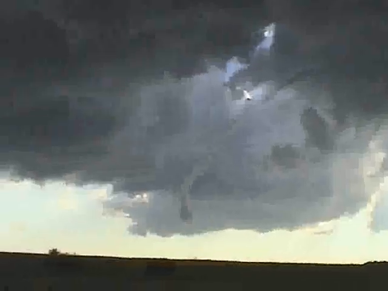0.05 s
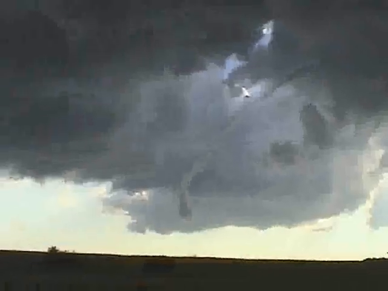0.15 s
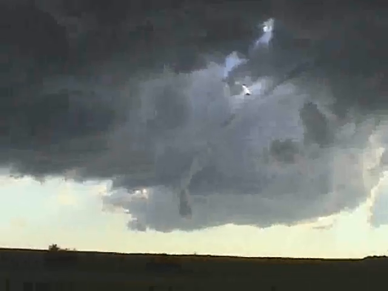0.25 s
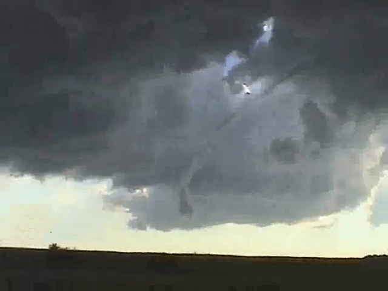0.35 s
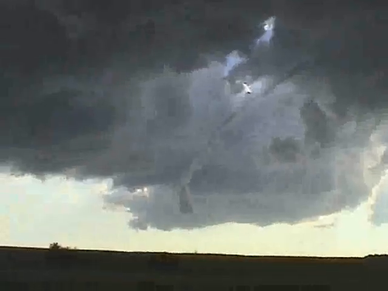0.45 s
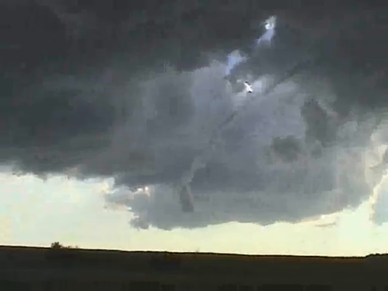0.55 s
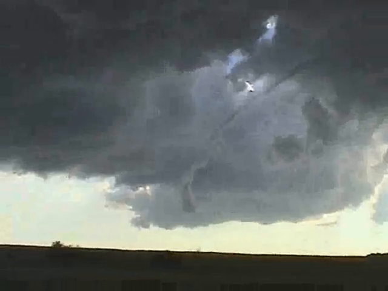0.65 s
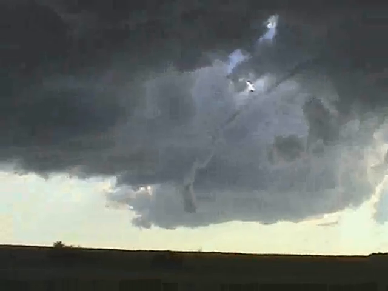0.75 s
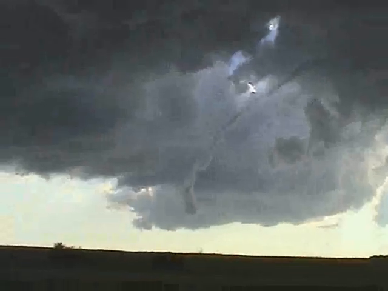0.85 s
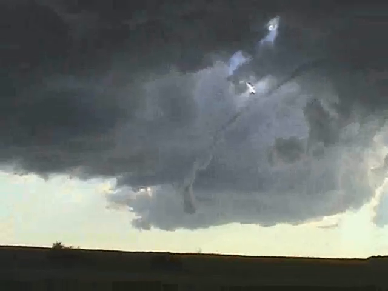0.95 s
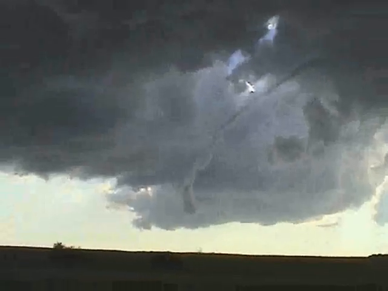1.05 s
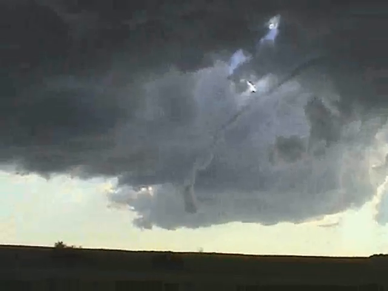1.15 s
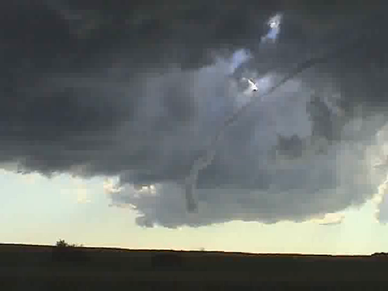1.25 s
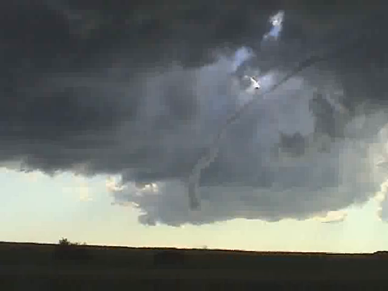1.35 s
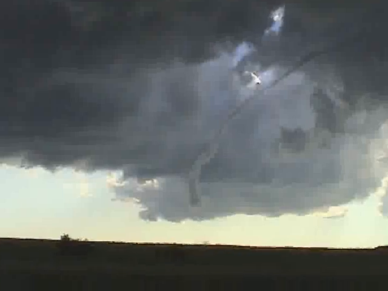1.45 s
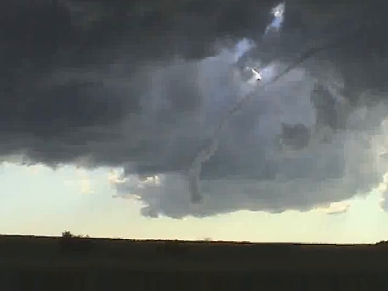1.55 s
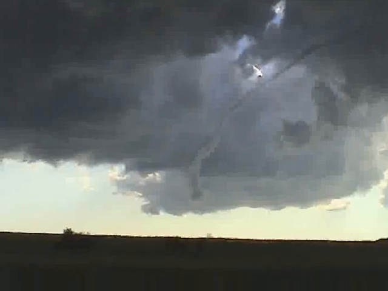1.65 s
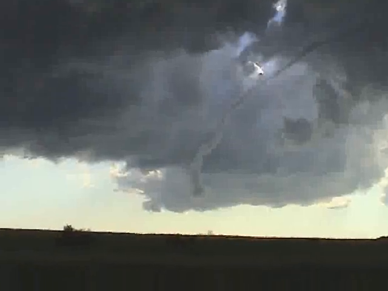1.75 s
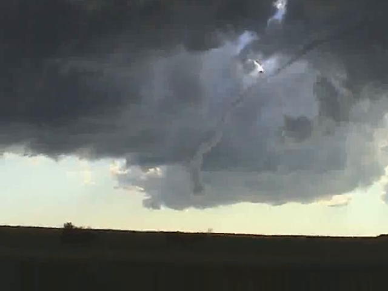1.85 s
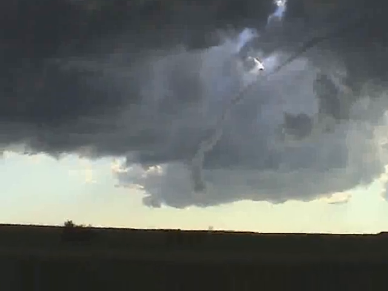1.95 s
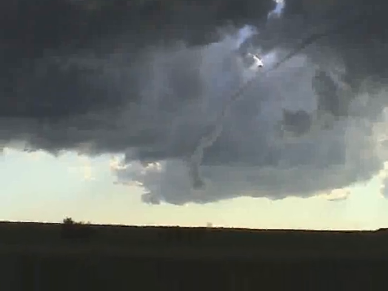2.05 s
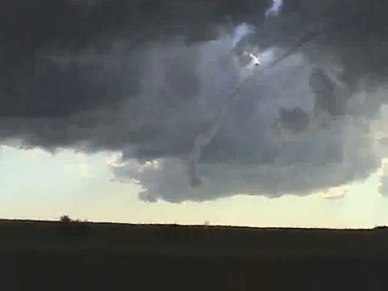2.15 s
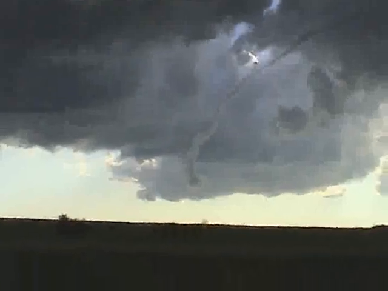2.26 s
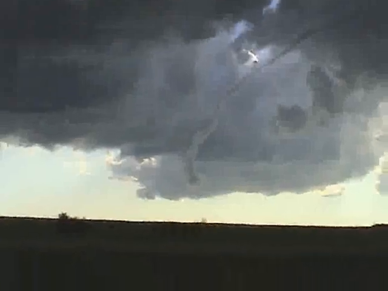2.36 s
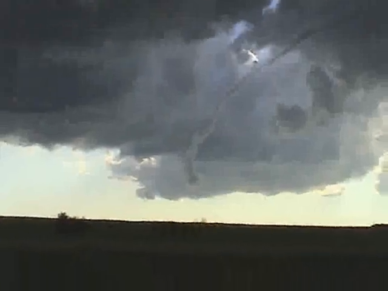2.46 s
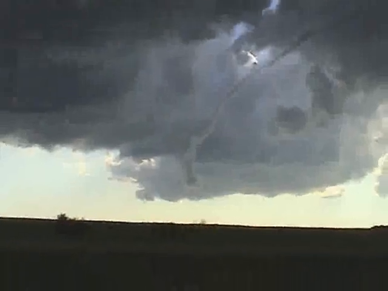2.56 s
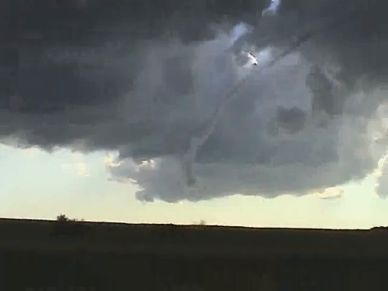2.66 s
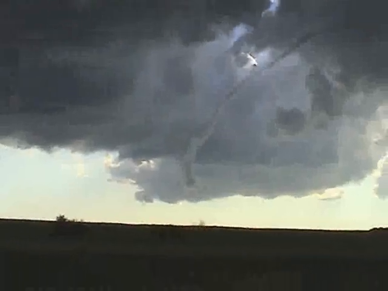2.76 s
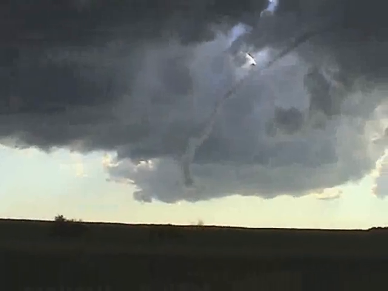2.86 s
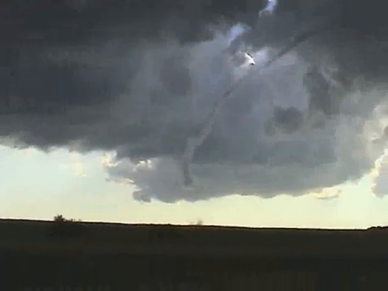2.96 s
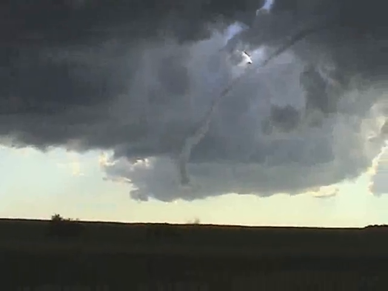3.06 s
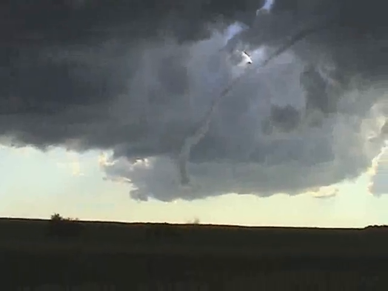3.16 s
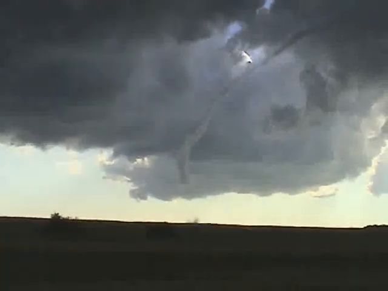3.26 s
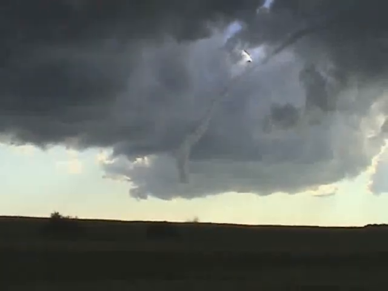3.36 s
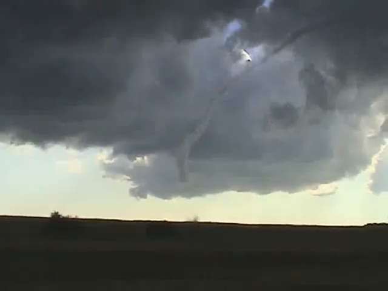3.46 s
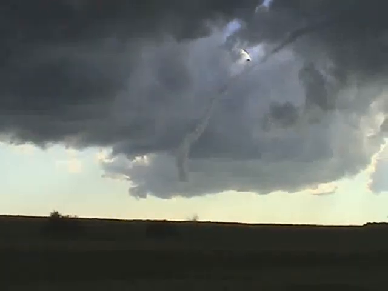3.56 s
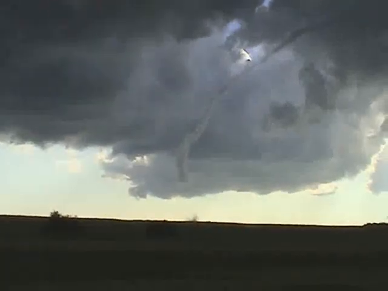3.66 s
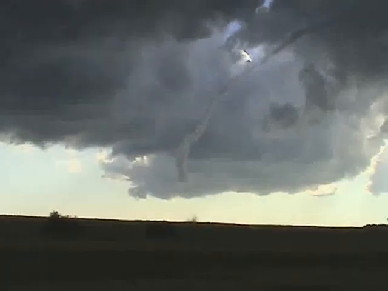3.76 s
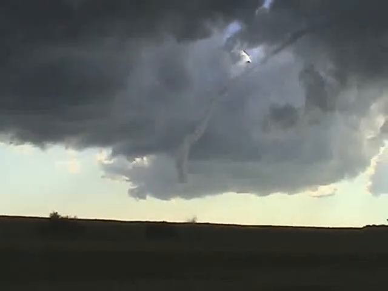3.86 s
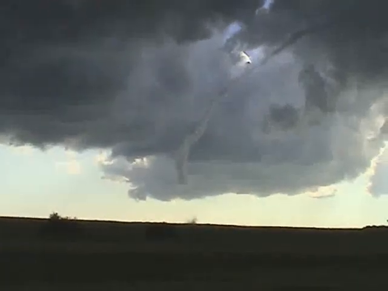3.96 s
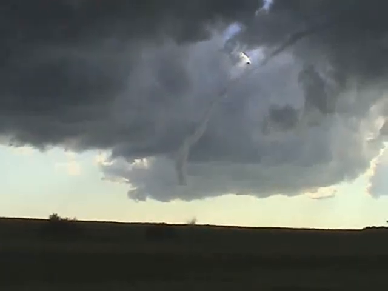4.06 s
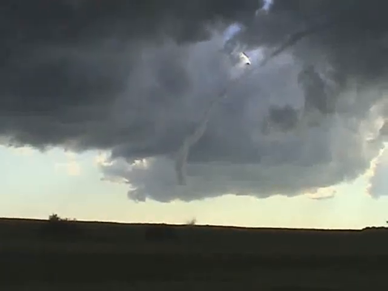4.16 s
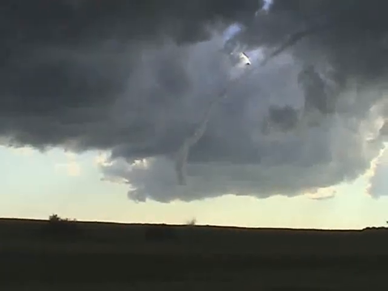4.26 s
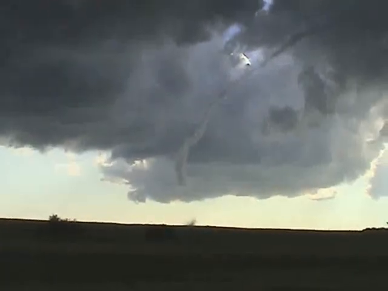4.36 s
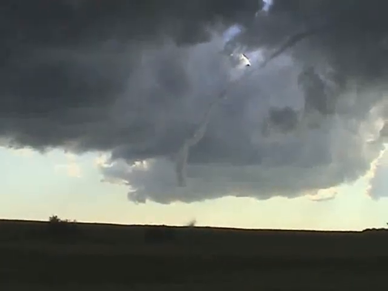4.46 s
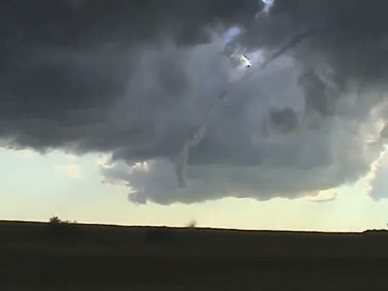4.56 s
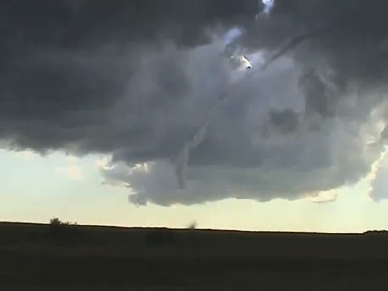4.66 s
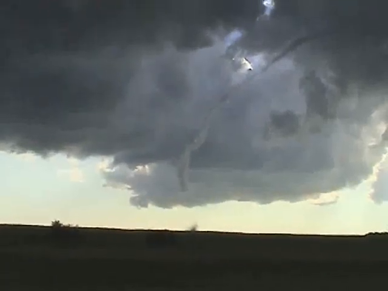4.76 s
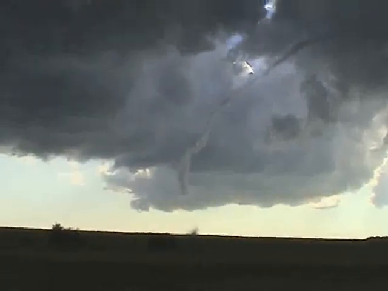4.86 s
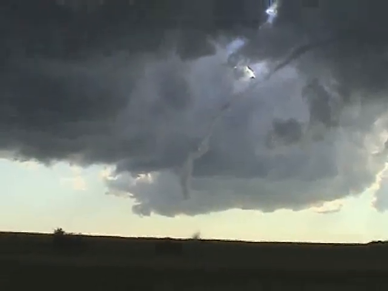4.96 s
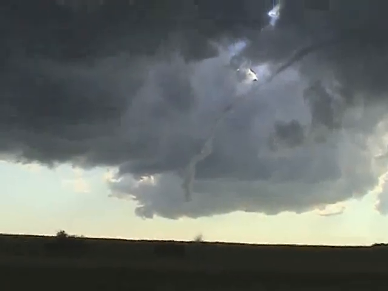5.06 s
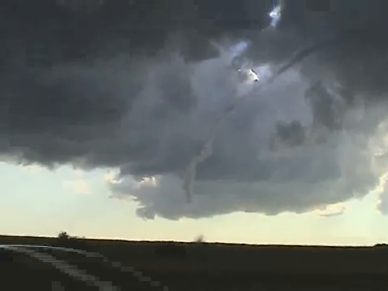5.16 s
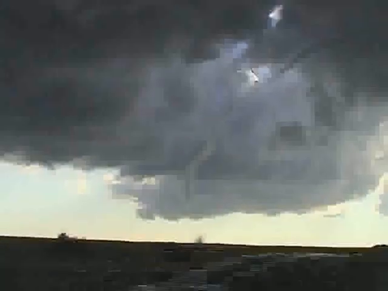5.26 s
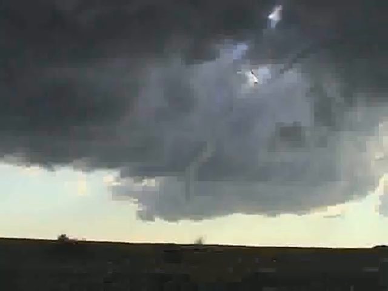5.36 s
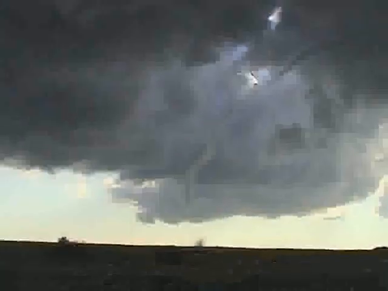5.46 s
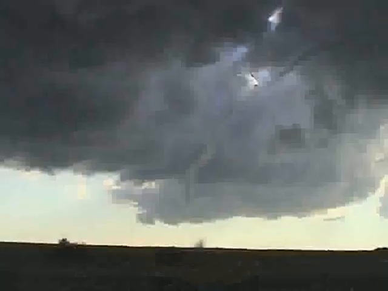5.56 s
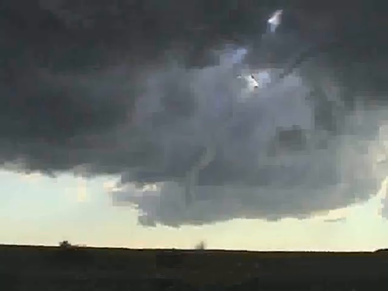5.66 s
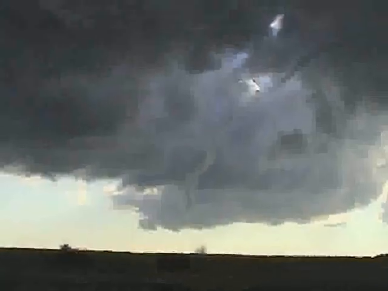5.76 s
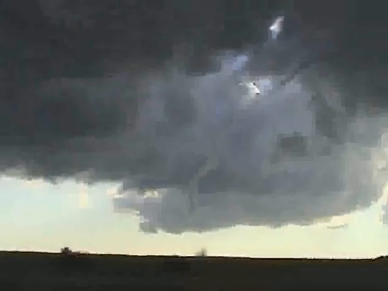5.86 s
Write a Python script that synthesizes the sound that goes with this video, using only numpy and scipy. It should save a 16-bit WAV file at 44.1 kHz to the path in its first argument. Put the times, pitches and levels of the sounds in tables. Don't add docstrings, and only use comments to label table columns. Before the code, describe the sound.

Heard from beside an idling vehicle on an open country road: low unsteady engine hum, faint belt whine and sparse flasher relay clicks. A car approaches from the left, its tyres singing and hissing, grows steadily louder, sweeps past with a falling pitch and begins receding to the right. Stereo sound with dull, compressed treble cuts abruptly to silence seven times in the first half.

```python
import sys
import numpy as np
from scipy import signal
from scipy.io import wavfile
from scipy.ndimage import uniform_filter1d, minimum_filter1d

SR = 44100
rng = np.random.default_rng(int(sys.argv[2]) if len(sys.argv) > 2 else 0)


def voltage_ratio(decibels):
    exponent = np.asarray(decibels, float) / 20
    return 10 ** exponent


def pcm_store(signal):
    levels = np.round(np.clip(np.atleast_2d(signal), -1, 1) * 32767)
    wavfile.write(sys.argv[1], SR, levels.astype(np.int16).T)


N = 261051
HZ = np.fft.rfftfreq(1024, 1 / SR)[:, None]
FRAME_S = np.arange(N // 256 + 5) * 256 / SR
SPEED, GAP, ABREAST = 29.5, 6.61, 5.2

# frequency in Hz, likeness 0-1, fixed left-right in dB,
# share of the bearing's dB, left lead in rad when far left.
CAR_PORTS = [(60, .95, -3, .1, .9), (250, .96, -2, .1, .7), (600, .9, -1.5, .45, .8),
             (1050, .96, 0, 1, .95), (2000, .88, 0, .9, 1.)]


def car():
    _, receding, _ = passing(FRAME_S)
    dip = bank_dip()
    same, fixed_db, share, lead = by_pitch(CAR_PORTS, HZ)
    bearing_db = -1.5 - 7.5 * receding
    left_db = fixed_db + share * bearing_db
    lead = lead * (0.45 - 0.63 * receding)
    return ports(tyre_noise() * dip, spectra(tyre_tones()) * dip, same, left_db, lead, patchy_db=1.0)


# frequency in Hz, width in Hz, level in dB, dB louder ahead than behind.
TREAD_MODES = [(834.3, 33, -6.5, -6), (896, 41, -7, 10.5), (981, 54, -3.5, 4), (954, 150, 0.5, 1.5),
               (1083.5, 17.6, -1.5, 3), (1147.5, 29, -5, 5)]
GROOVE_MODES = [(1284, 62, -3, 6), (1496, 61, -0.5, 2.3), (1646, 89, -0.5, 0.7)]
# time in seconds, level in dB.
SINGING = [(0, 3.5), (.7, 1), (1.4, 4.5), (2.1, 1.5), (3.4, -1), (3.9, -1.5), (4.4, -.5), (4.61, -2.5),
           (4.64, 2.5), (4.74, 0), (5.02, 2), (5.17, 0), (5.32, -2.5), (5.56, 2.5), (5.64, 0), (5.92, -3.5)]
# level abreast in dB, share of
# spreading loss, horn gain ahead in dB, horn gain behind in dB, share of road gain.
SONG_LEVEL = (-10, 1.23, 5, -1.5, .5)
BLOCKS_LEVEL = (-22, 0.96, 10.5, -7, -1)
ROAR_LEVEL = (-20.5, 0.78, 6.5, 4.5, 0.8)


def tyre_tones():
    t = np.arange(N) / SR
    _, receding, shift = passing(t)
    road = rng.standard_normal(N) * voltage_ratio(0.5 * slow(40))
    song = ringing(road, TREAD_MODES, receding, shift)
    grooves = ringing(road, GROOVE_MODES, receding, shift)
    blocks_hz = 1004 * shift * (1 + 0.0054 * slow(30))
    blocks_db = heard_db(BLOCKS_LEVEL, t) + 2.3 * slow(18)
    blocks = np.sqrt(2) * voltage_ratio(blocks_db) * np.sin(2 * np.pi * np.cumsum(blocks_hz) / SR)
    sung = voltage_ratio(heard_db(SONG_LEVEL, t)) * song + blocks
    return voltage_ratio(columns(SINGING, t)[0]) * sung + voltage_ratio(heard_db(ROAR_LEVEL, t) - 0.5) * grooves


def ringing(road, modes, receding, shift):
    out = np.zeros(N)
    for hz, width, db, ahead_db in modes:
        out += voltage_ratio(db - ahead_db * receding / 2) * evened(resonate_twice(road, hz * shift, width))
    return evened(out)


# frequency in Hz, level in dB per Hz.
RUMBLE = [(30, -45), (70, -4.5), (150, -1), (250, 0), (420, -4), (650, -5.5), (900, -0.5), (1500, -55.5),
          (3000, -94)]
ROAR = [(400, -23.5), (700, -13.5), (1200, -10.5), (1800, 0), (2200, -3), (3000, -16.5), (4500, -22),
        (7000, -88)]
HISS = [(1500, -26), (2500, -0.5), (3500, -1), (5000, -3.5), (7000, -7.5), (9000, -10.5), (11500, -12.5)]
# level abreast in dB, share of spreading loss, horn gain ahead in dB,
# horn gain behind in dB, share of road gain.
RUMBLE_LEVEL = (-17.5, 1.01, 5, -1.5, .3)
HISS_LEVEL = (-19, 0.97, 1.5, 0.5, 1.24)


def tyre_noise():
    metres, _, shift = passing(FRAME_S)
    flicker_db = 1.1 * slow_frames(50)
    air_db = 0.1973 * metres * (HZ / 1e4) ** 2
    shaded_db = np.minimum(1 * (metres - GAP), 7.5)
    dulled_db = air_db + shaded_db * np.clip((HZ - 8620) / 1000, 0, 1)
    layers = [(RUMBLE, heard_db(RUMBLE_LEVEL, FRAME_S)),
              (ROAR, heard_db(ROAR_LEVEL, FRAME_S) + 0.39 * flicker_db),
              (HISS, heard_db(HISS_LEVEL, FRAME_S) + flicker_db - dulled_db)]
    return np.sqrt(sum((colour(spectrum, shift) * voltage_ratio(db)) ** 2 for spectrum, db in layers))


def passing(t):
    along = SPEED * (t - ABREAST)
    metres = np.hypot(along, GAP)
    receding = along / metres
    return metres, receding, 1 / (1 + receding * SPEED / 343)


# time in seconds, level in dB.
ROAD = [(0, 2), (.6, -1.5), (1.2, 2.5), (1.7, -1.5), (2.2, -0.5), (2.9, 0.5), (3.4, 1), (3.95, -2),
        (4.3, -1.5), (4.58, 1.5), (4.8, 0.5), (5.02, -1.5), (5.13, 1), (5.32, 0.5), (5.55, 0), (5.75, -1.5),
        (5.86, 1.5), (5.92, 2.5)]


def heard_db(layer, t):
    abreast_db, spread, ahead_db, behind_db, coarse = layer
    along = SPEED * (t - ABREAST)
    off_deg = np.degrees(np.arctan2(GAP, abs(along)))
    ahead = ahead_db * np.exp(-((off_deg - 30.1) / 19.3) ** 2)
    behind = behind_db * np.exp(-((off_deg - 50) / 24.3) ** 2)
    horn_db = np.where(along < 0, ahead, behind)
    spreading_db = 20 * np.log10(GAP / np.hypot(along, GAP))
    return abreast_db + spread * spreading_db + horn_db + coarse * columns(ROAD, t)[0]


def bank_dip():
    since = FRAME_S - 1.55
    octaves = np.log2((HZ + 1) / 2400) - 0.95 * since
    return voltage_ratio(-7.5 * np.exp(-(octaves / 0.37) ** 2 - (since / 0.98) ** 4))


# start in seconds, level in dB, 1 closing or 0 opening.
TICKS = [
    (0.528, -31.5, 1),
    (.838, -48, 0),
    (1.244, -39, 1),
    (1.562, -36.5, 0),
    (1.886, -32, 1),
    (2.169, -37.5, 0),
    (2.491, -31.5, 1),
    (3.187, -31, 1),
    (3.861, -30.5, 1),
]
# frequency in Hz, width in Hz, dB when closing, dB when opening.
RELAY_CASE = [(2090, 180, -2, -25), (3420, 560, 2, -19), (4560, 1300, 0.5, 0), (5640, 500, -7, -8),
              (6470, 860, 1, -8), (8800, 530, -9, -22)]


def relay():
    out, t = np.zeros(N), np.arange(2000) / SR
    for start, db, closing in TICKS:
        t60 = 0.08 if closing else 0.045
        chatter = rng.standard_normal(len(t)) * np.minimum(t / 0.00079, 1) * voltage_ratio(-60 * t / t60)
        ring = np.zeros(len(t))
        for hz, width, shut_db, open_db in RELAY_CASE:
            ring += voltage_ratio(shut_db if closing else open_db) * evened(resonate_twice(chatter, hz, width))
        out[round(start * SR):][:len(t)] += voltage_ratio(db - 9.0) * evened(ring)
    return out


# time in seconds, firing rate in Hz.
IDLE = [(0, 77.86), (.6, 77.7), (1.5, 77.2), (2.3, 76.87), (3.2, 76.28), (5.92, 75.8)]
# dB when settled, dB gained per Hz above settled.
ORDER_LEVELS = [(-39.5, 3), (-45, 6)]
# frequency in Hz, width in Hz, level in dB.
WHINES = [(253.4, 16.5, -48), (422, 11.5, -43.5), (453, 2.4, -50), (636, 3.5, -49), (1042, 19, -38.5),
          (1160, 4.7, -48.5), (1280, 36, -45)]
# frequency in Hz, level in dB per Hz.
BAY = [(25, -31), (45, -21.5), (62, -4), (110, -12.5), (230, -15.5), (500, -12), (1070, -11.5),
       (2000, -27.5), (3600, -41), (6000, -42), (7900, -52), (8900, -40), (9700, -42), (10300, -33),
       (11700, -29.5)]
# frequency in Hz, likeness 0-1, left-right in dB, left lead in rad.
BAY_PORTS = [(30.1, .8, -2, .8), (75, 1, -6, 1), (200, 1, -4, 0.53), (600, 0.71, -2.5, 0.26),
             (1090, 0.45, 3, 0.7), (2000, 1, -7, 0.34)]


def parked():
    hz, = columns(IDLE, np.arange(N) / SR)
    first_db, second_db = (db + per_hz_db * (hz - 76.4) for db, per_hz_db in ORDER_LEVELS)
    first_db = first_db + 1.0 * slow(20)
    second_db = second_db + 1.7 * slow(9.4)
    turns = 2 * np.pi * np.cumsum(hz * (1 + 0.0098 * slow(5.77))) / SR
    hum = np.sqrt(2) * (voltage_ratio(first_db) * np.sin(turns) + voltage_ratio(second_db) * np.sin(2 * turns + 1.04))
    shake = rng.standard_normal(N)
    whine = sum(voltage_ratio(db) * evened(resonate(shake, f, width)) for f, width, db in WHINES)
    bay = colour(BAY) * voltage_ratio(-32.5 + 0.94 * slow_frames(30))
    return ports(bay, spectra(hum + whine), *by_pitch(BAY_PORTS, HZ), patchy_db=1.2)


def ports(size, direct, same, left_db, lead, patchy_db):
    a, b, c, d, patches = rng.standard_normal((len(FRAME_S), 513, 5)).T
    patches = uniform_filter1d(uniform_filter1d(patches, size=10, axis=0), size=12, axis=1)
    size = size * voltage_ratio(patchy_db * evened(patches))
    same = np.clip(same, 0, 1)
    one = size * (a + 1j * b)
    other = same * one + np.sqrt(1 - same ** 2) * size * (c + 1j * d)
    tilt = voltage_ratio(left_db / 2) * np.exp(0.5j * lead)
    return unspectra(np.array([(one + direct) * tilt, (other + direct) / tilt]))


def evened(x):
    return x / np.sqrt(np.mean(np.abs(x) ** 2) + 1e-20)


def columns(rows, at):
    s, *values = np.transpose(rows)
    return [np.interp(at, s, v) for v in values]


def by_pitch(rows, hz):
    f, *values = np.transpose(rows)
    return [np.interp(np.log(hz + 1), np.log(f + 1), v) for v in values]


def slow_frames(rate_hz):
    rates = np.geomspace(rate_hz / 20, rate_hz, 20)
    return evened(sum(np.sin(2 * np.pi * (f * FRAME_S + rng.random())) / np.sqrt(f) for f in rates))


def slow(rate_hz):
    return slow_frames(rate_hz).repeat(256)[:N]


def resonate(x, hz, width):
    turn = np.exp(2j * np.pi * np.cumsum(hz * np.ones(len(x))) / SR)
    r = np.exp(-np.pi * width / SR)
    return 2 * (turn * signal.lfilter([1 - r], [1, -r], x / turn)).real


def resonate_twice(x, hz, width):
    return resonate(resonate(x, hz, width), hz, 2 * width)


def colour(spectrum, shift=1):
    size = voltage_ratio(by_pitch(spectrum, HZ / (shift * np.ones(len(FRAME_S))))[0])
    return size / np.sqrt((size ** 2).sum(0)) * np.sqrt(4 / 3)


def spectra(x):
    return signal.stft(np.pad(x, (0, 2048)), nperseg=1024, noverlap=768)[2][:, :len(FRAME_S)]


def unspectra(z):
    return signal.istft(z, nperseg=1024, noverlap=768)[1][..., :N]


def scene():
    return car() + relay() + parked()


def limited(x, ceiling):
    room = np.minimum(ceiling / (abs(x).max(0) + 1e-9), 1)
    return x * uniform_filter1d(minimum_filter1d(room, size=129), size=65)


# start in seconds, length in seconds, level in dB.
WIDE = [
    (5.505, .1, -2.5),
    (5.734, .1, -1.5),
    (5.912, .05, -23),
]


def folded(side, stray_share, stray_top_hz):
    z = signal.stft(side, nperseg=1024, noverlap=768)[2]
    t = FRAME_S[:z.shape[1]]
    wide = np.zeros(len(t))
    for start, length, db in WIDE:
        wide += voltage_ratio(db) * np.clip(np.minimum(t - start, start + length - t) / 0.03, 0, 1)
    stray = rng.random((len(t) // 8 + 1, 171)).T < stray_share
    stray = stray.repeat(3, axis=0).repeat(8, axis=1)[:, :len(t)]
    return unspectra(z * np.maximum((HZ < 2440) | (stray & (HZ < stray_top_hz)), wide))


def starved(x, under_db, follow, from_hz, fickle_db):
    z = signal.stft(x, nperseg=1024, noverlap=768)[2]
    power = (abs(z) ** 2).mean(0)
    patch = uniform_filter1d(uniform_filter1d(power, size=4, axis=0), size=11, axis=1)
    loud = uniform_filter1d(power.sum(0), size=15)
    fickle = rng.standard_normal((z.shape[2] // 8 + 1, 129)).T
    fickle = fickle.repeat(4, axis=0).repeat(8, axis=1)[:513, :z.shape[2]]
    kept = (patch > voltage_ratio(2 * (under_db + fickle_db * fickle)) * loud ** follow) | (HZ < from_hz)
    return unspectra(z * kept)


# cut in seconds, return in seconds, remnant length in seconds, 1 smeared or 0 clean edges.
DROPOUTS = [
    (.1025, .2022, .04, 1),
    (.6683, .779, .022, 0),
    (.8815, .948, .026, 1),
    (1.249, 1.3147, .03, 1),
    (1.7487, 1.8157, .04, 1),
    (2.6836, 2.8053, .024, 0),
    (3.224, 3.3242, .02, 0),
]


def dropped_out(x):
    t = np.arange(N) / SR
    gain, faint = np.ones(N), np.zeros(N)
    for cut, back, length, smeared in DROPOUTS:
        remnant = voltage_ratio(-18 - 480 * np.abs(t - cut)) * np.clip((cut + length - t) / 0.0023, 0, 1) ** 2
        pre_echo = voltage_ratio(-22 - 5500 * np.maximum(back - t - 0.001, 0))
        lost = (t > cut) & (t < back)
        edge_s = 0.0009 if smeared else 1 / SR
        edge = np.sin(np.pi / 2 * np.clip(np.maximum(cut - t, t - back) / edge_s, 0, 1)) ** 2
        gain = gain * edge
        faint = faint + smeared * lost * (remnant + pre_echo)
    thin = signal.lfilter([2, -1.6], 1, x)
    return x * gain + thin * faint


def low_pass(x):
    return signal.sosfilt(signal.butter(12, 15800, fs=SR, output="sos"), x)


def record(dry):
    left, right = limited(dry, 0.97)
    mid, side = (left + right) / 2, (left - right) / 2
    side = folded(side, stray_share=0.014, stray_top_hz=7200)
    band = signal.firwin(511, 11800, window=("kaiser", 9), fs=SR)
    x = signal.oaconvolve([mid + side, mid - side], band[None], "same")
    x = starved(x, under_db=-56, follow=0.82, from_hz=4500, fickle_db=2.5)
    return low_pass(np.clip(dropped_out(x), -1, 1))


dry = scene()
out = record(dry)
pcm_store(out)
```